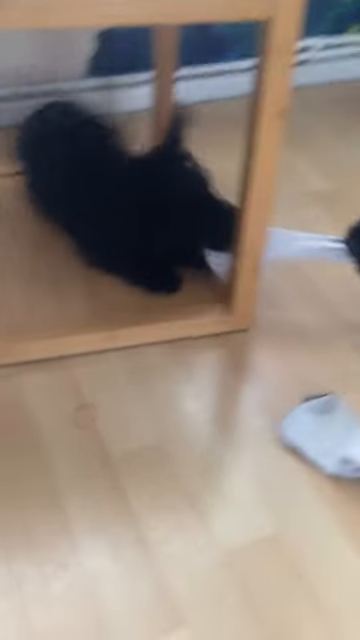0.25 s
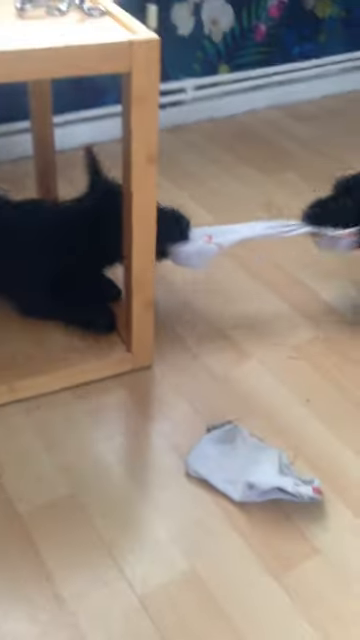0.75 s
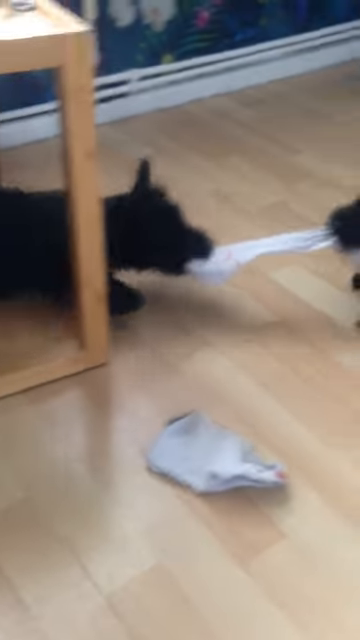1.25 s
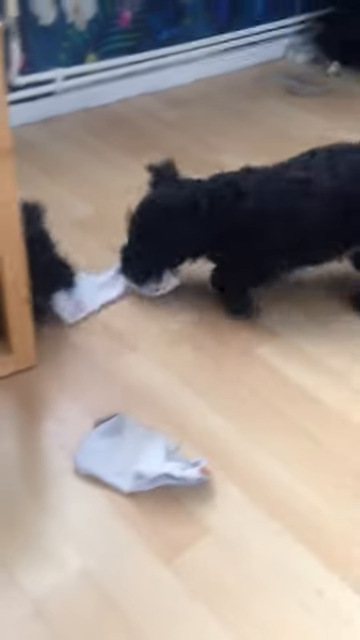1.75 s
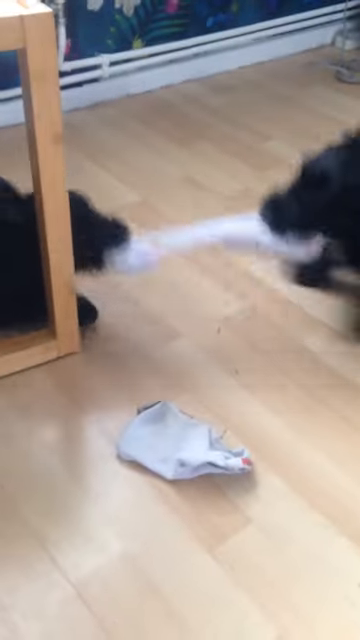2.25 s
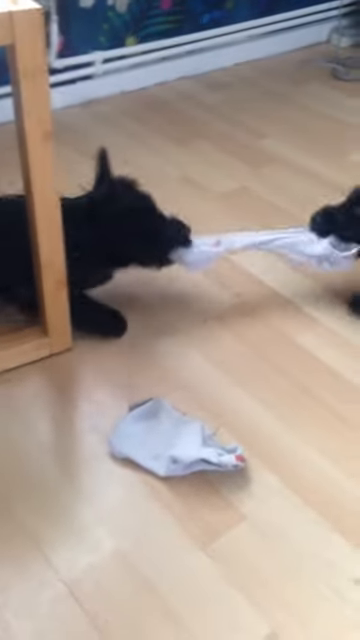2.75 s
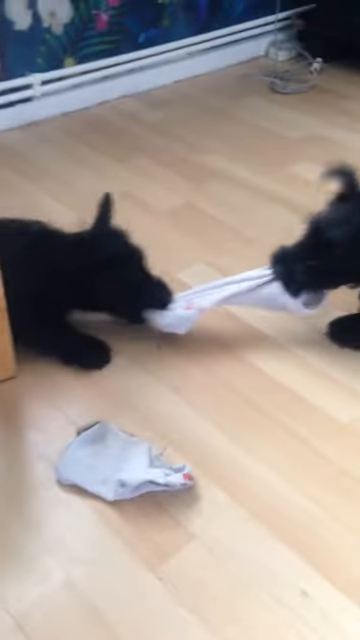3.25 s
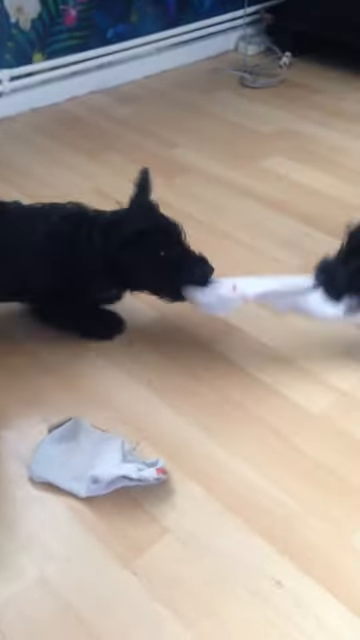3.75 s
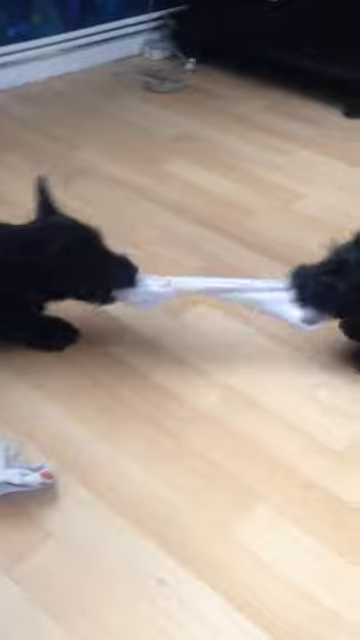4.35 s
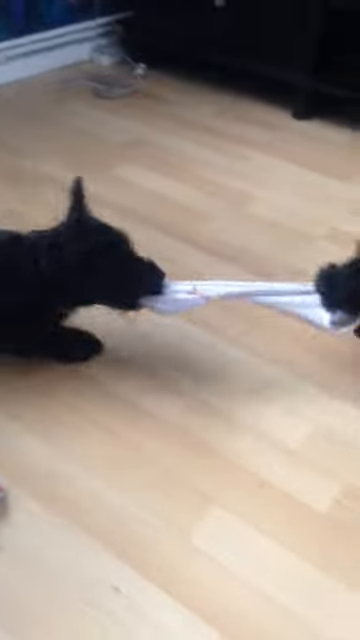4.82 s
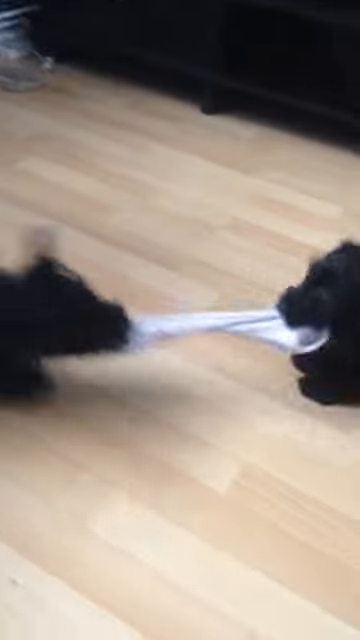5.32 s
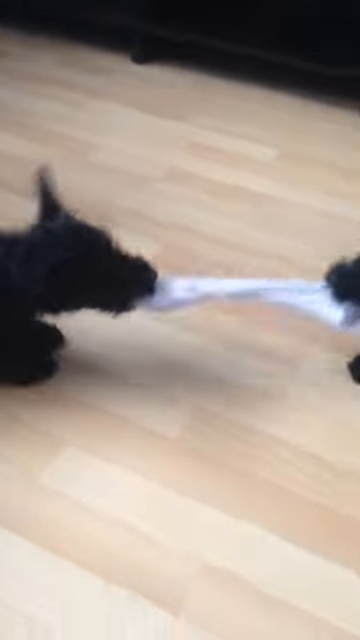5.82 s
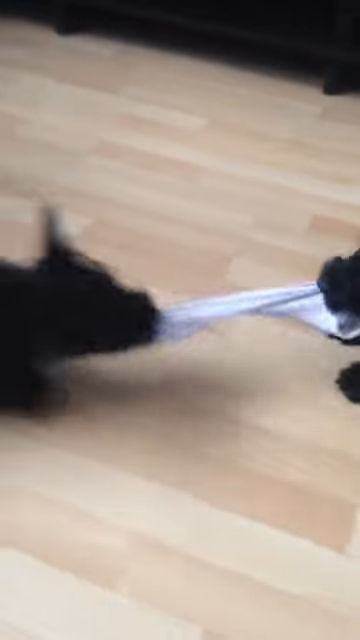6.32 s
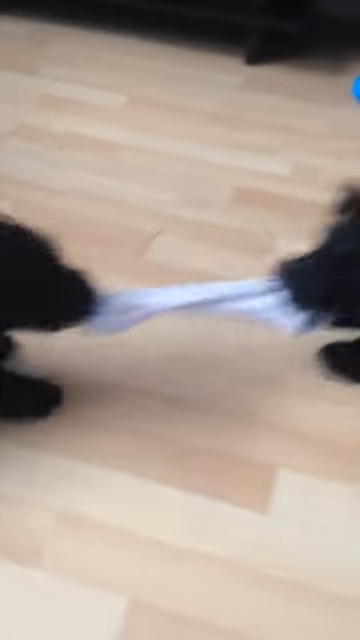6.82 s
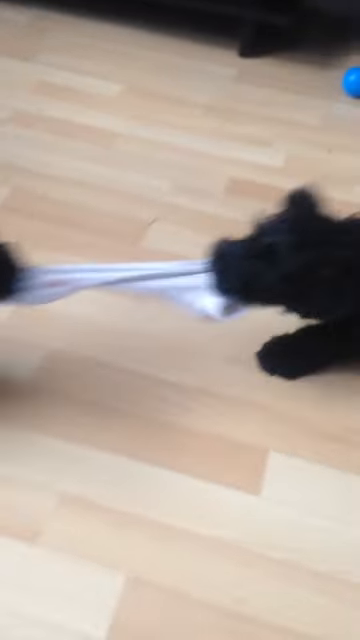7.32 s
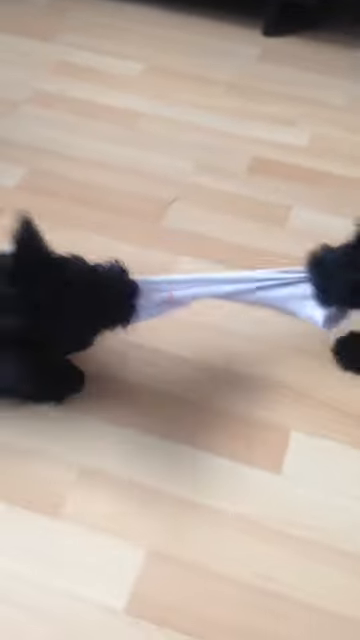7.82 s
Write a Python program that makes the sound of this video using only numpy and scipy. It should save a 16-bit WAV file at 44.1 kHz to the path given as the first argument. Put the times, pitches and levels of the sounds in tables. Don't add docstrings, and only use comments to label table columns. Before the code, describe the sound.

Two small dogs wrestle over a cloth on laminate. First come hollow wooden knocks, floor thumps and one sharp slap amid dry rustling. After three seconds the knocks stop; a strong nasal snort leads to tiny claw ticks, padded footfalls and brief throaty growls, loudest near the middle. Late on, only soft grunts, wheezy breath and a bright hiss remain. Small room, slight reverberation, near phone microphone.

```python
import sys
import numpy as np
from scipy import signal
from scipy.fft import rfft, irfft, next_fast_len
from scipy.io import wavfile
from scipy.ndimage import uniform_filter1d, map_coordinates

SR = 44100
rng = np.random.default_rng(int(sys.argv[2]) if len(sys.argv) > 2 else 0)


def wav_record(signal):
    frames = np.transpose(np.atleast_2d(signal))
    bounded = np.clip(frames, -1, 1)
    quanta = np.round(bounded * 32767).astype(np.int16)
    wavfile.write(sys.argv[1], SR, quanta)


def volts_from_db(level):
    exponent = np.asarray(level, float) / 20
    return 10 ** exponent


N = 355887

# (frequency [Hz], level [dB], t60 [s])
BOARD_MODES = [(98, -15, 0.038), (138, 7.5, 0.04), (200, 4.5, 0.045), (279, -7, 0.1)]


def unit(x):
    return x / np.sqrt(np.mean(x ** 2) + 1e-20)


def along(points, hz):
    f, v = np.transpose(points)
    return np.interp(np.log(hz + 1), np.log(f + 1), v)


def wobble(rate):
    knots = rng.standard_normal(int(N * rate / SR) + 4)
    return map_coordinates(knots, [np.arange(N) * rate / SR])


def filtered(x, response):
    m = next_fast_len(len(x) + SR // 4)
    return irfft(rfft(x, m) * response(np.fft.rfftfreq(m, 1 / SR)), m)[:len(x)]


def low_cut(f, hz, order=4):
    return 1 / (1 + (hz / (f + 1)) ** order)


def high_cut(f, hz):
    return 1 / (1 + (f / hz) ** 4)


def resonances(modes):
    def response(f):
        total = 0
        for k, (centre, width, db) in enumerate(modes):
            total = total + (-1) ** k * volts_from_db(db) * 1j * f * width / (centre * centre - f * f + 1j * f * width)
        return total
    return response


def noise(spectrum):
    return unit(filtered(rng.standard_normal(N), lambda hz: volts_from_db(along(spectrum, hz))))


def ring(modes, t, spread_db):
    x = np.zeros(len(t))
    for hz, db, t60 in modes:
        x += volts_from_db(db + spread_db * rng.normal() - 60 * t / t60) * np.sin(2 * np.pi * hz * t)
    return x / np.abs(x).max()


def add(track, s, x):
    at = round(s * SR)
    part = track[max(at, 0):][:len(x) + min(at, 0)]
    part += x[max(-at, 0):][:len(part)]


def room(x):
    # (frequency [Hz], t60 [s])
    decay = [(100, 0.44), (500, 0.37), (2000, 0.37), (6000, 0.27), (14000, 0.013)]
    hz, t, z = signal.stft(rng.standard_normal(SR // 2), SR, nperseg=256)
    tail = signal.istft(z * volts_from_db(-60 * t / along(decay, hz)[:, None]), SR, nperseg=256)[1]
    late = np.pad(x, (200, 0))
    return signal.fftconvolve(late, tail / np.linalg.norm(tail))[:len(x)]


def table():
    # (time [s], peak [dB], thump [dB], slap [dB], pitch of the struck part [Hz])
    bumps = [(-.03, -17.5, -20, -40, 430), (0.236, -16.5, -11.5, -43, 440), (0.267, -2, -19.5, -16.5, 486),
             (.886, -14, -9.5, -35, 490), (1.157, -51.5, -23, 6, 453), (1.284, -32, -39, -32, 583),
             (1.717, -25, -5, -30, 386), (1.768, -26.5, -28, -32, 1080), (1.905, -33, -36, -10, 1110),
             (2.287, -10.5, -9.5, -39, 716), (2.29, -18.5, -38, -42, 360), (2.81, -32.5, -10, -28, 1100)]
    # (frequency [Hz], level [dB], t60 [s])
    frame_modes = [(372, -2, .2), (415, 1, .22), (470, -3, .2), (515, -3, .18), (550, -5, .12),
                   (620, -4, .14), (655, 0, .14), (716, 0, .22), (765, -2, .14), (1035, -4, .15),
                   (1160, -7, .15), (1470, -9, .16), (1860, -11, .16), (2150, -12, .16)]
    out, t = np.zeros(N), np.arange(SR // 2) / SR
    onset = 1 - np.exp(-(t / .004) ** 2)
    held = .34 + .66 * volts_from_db(-60 * t / .045)
    for s, db, thump_db, slap_db, hz in bumps:
        clack_db = -19 + 0.68 * max(-29.5 - db, 0)
        modes = []
        for f, level, t60 in frame_modes:
            octaves = abs(np.log2(f / hz))
            modes.append((f, level - 5 * octaves, t60 / (1 + 1.2 * octaves)))
        blow = volts_from_db(-60 * t / 0.066) * rng.standard_normal((3, len(t)))
        joints = filtered(blow[2], lambda f: resonances([(hz, 500, -4)])(f) * high_cut(f, 1200))
        frame = filtered(held * ring(modes, t, spread_db=1.5) + joints, lambda f: low_cut(f, 300))
        clack = filtered(blow[0], resonances([(1405, 1400, 7.5), (2050, 980, 9.0), (2570, 510, 2.0),
                                              (4900, 1900, -12)]))
        slap = filtered(blow[1], resonances([(4050, 1000, 0.0088), (9000, 2600, 0.0066)]))
        thump = ring(BOARD_MODES, t, spread_db=1.5)
        mix = frame + volts_from_db(thump_db) * thump + volts_from_db(clack_db) * clack + volts_from_db(slap_db) * onset * slap
        direct = onset * volts_from_db(db + 3.5) * mix
        add(out, s, direct + volts_from_db(-9) * room(direct))
    return out


def patchy(x):
    z = signal.stft(x, nperseg=256)[2]
    field = uniform_filter1d(rng.standard_normal(z.shape), size=5, axis=0)
    field = uniform_filter1d(field, size=10, axis=1)
    patch_db = 2.2
    return signal.istft(z * volts_from_db(patch_db * unit(field)), nperseg=256)[1][:len(x)]


def scuffle():
    # (time of the peak [s], peak [dB], rise [s], fall [s])
    slides = [(0, -63.5, .1, .25), (.259, -53.5, 0.16, 0.44), (.654, -54.5, 0.17, 0.23),
              (0.879, -57, 0.069, 1), (1.252, -57.5, 0.19, 0.38), (1.781, -58, 0.066, 0.22),
              (1.96, -54.5, 0.081, 0.098), (2.14, -58.5, 0.13, 0.94), (2.48, -58, 0.14, 0.2),
              (2.769, -50, 0.13, 0.13), (3.038, -61, 0.75, 0.1), (3.218, -53.5, 0.1, 0.094),
              (3.368, -59, 0.019, 0.036), (3.497, -61, 0.058, 0.42), (3.76, -50.5, 0.078, 0.31),
              (3.88, -58, 0.2, 0.14), (4.076, -64.5, 0.072, 0.17), (4.225, -60, 0.28, 0.56),
              (4.605, -57, 0.29, 0.1), (4.764, -58.5, 0.015, 0.018), (4.929, -56, 0.17, 0.31),
              (5.348, -58, .16, 0.86), (5.682, -57.5, 0.3, 0.2), (6.006, -62.5, 0.29, 0.99),
              (6.276, -59.5, 0.15, 0.24), (6.52, -58.5, 0.22, 0.26), (6.795, -63, 0.2, 0.44),
              (7.119, -60, 0.093, 0.15), (7.47, -58, 0.27, 0.46), (7.927, -61.5, 0.15, 0.84)]
    # (time [s], fizz over rub [dB])
    nap = [(0, -7), (.65, -7.5), (1.2, -5), (1.95, -10), (2.3, -4.5), (2.8, -11), (4.2, -6.5), (4.8, -8.5),
           (5.7, -5), (8.07, -1.5)]
    # (time [s], level [dB])
    haul = [(0, -81), (.32, -67.5), (.9, -73), (1.12, -62.5), (1.3, -60.5), (1.75, -80), (1.89, -64.5),
            (2.2, -70.5), (2.4, -59), (2.54, -66), (3.28, -67), (3.53, -87), (3.66, -70), (4.67, -69.5),
            (5.2, -67.5), (6.61, -70), (8.07, -70)]
    # (frequency [Hz], level [dB per Hz])
    rub_spectrum = [(1060, -6), (1800, -3), (3350, -0.5), (3790, 1), (4560, -1), (5090, 0), (9130, -2.5),
                    (10500, -15), (13600, -89.5), (22000, -120)]
    fizz_spectrum = [(7500, -61), (9000, 9.5), (10000, 14.5), (13000, 13), (15300, 5), (16500, -26)]
    drag_spectrum = [(120, -23), (300, -11), (450, 1.5), (900, -2), (1100, -1), (1700, -5.5), (2200, -7.5),
                     (2800, -15.5), (3500, -49)]
    still_db, point = -72.5, 1.86
    t = np.arange(N) / SR
    power = volts_from_db(2 * still_db) + np.zeros(N)
    for s, db, rise, fall in slides:
        power += volts_from_db(2 * db) * np.interp(t, [s - rise, s, s + fall], [0, 1, 0]) ** (2 * point)
    grain = unit(volts_from_db(1.27 * wobble(35) + 0.83 * wobble(300)))
    rub = np.sqrt(power) * volts_from_db(wobble(34)) * noise(rub_spectrum)
    fizz_db = np.interp(t, *np.transpose(nap)) + wobble(20)
    fizz = np.sqrt(power) * volts_from_db(fizz_db) * noise(fizz_spectrum)
    drag = volts_from_db(np.interp(t, *np.transpose(haul)) + wobble(34)) * noise(drag_spectrum)
    return grain * patchy(rub + fizz + drag)


def hush():
    # (frequency [Hz], level [dB per Hz])
    hush_spectrum = [(24, -36), (40, 7), (103, 7.5), (286, 0), (425, -2.5), (633, -15), (792, 3.5),
                     (897, -53), (1020, -17), (2960, -11), (6730, -10), (12200, -24), (15300, -16)]
    return volts_from_db(-69 + wobble(3.7)) * noise(hush_spectrum)


def snorts():
    # (time [s], peak [dB], rise [s], t60 [s], pitch [Hz])
    jets = [
        (0.052, -49.5, 0.016, 0.24, 5200),
        (3.753, -26.5, 0.022, 0.2, 4570),
        (3.904, -47, 0.006, .08, 4500),
        (4.929, -50, 0.0067, 0.21, 6000),
        (5.621, -52, 0.023, 0.15, 8000),
        (7.934, -34, 0.037, 0.18, 12800),
        (7.94, -42.5, 0.039, 0.24, 3170),
    ]
    out, t = np.zeros(N), np.arange(SR // 4) / SR
    for s, db, rise, t60, hz in jets:
        nose = resonances([(hz, 1.1 * hz, 0), (3800, 1200, -3)])
        jet = filtered(rng.standard_normal(len(t)),
                       lambda f: nose(f) * low_cut(f, 1500, order=2) * high_cut(f, 14000))
        add(out, s, volts_from_db(db - 60 * t / t60) * np.clip(t / rise, 0, 1) ** 2 * unit(jet))
    return out


def paws():
    # (time [s], peak [dB], pitch [Hz])
    landings = [(1.539, -69, 186), (2.118, -50.5, 380), (2.85, -61, 516), (3.801, -43.5, 546),
                (4.098, -39.5, 200), (4.762, -51, 726), (3.474, -54, 430), (4.892, -28.5, 444),
                (5.023, -36, 432), (5.804, -54, 585), (6.279, -48.5, 560), (6.888, -52.5, 810),
                (7.773, -73, 403), (1.882, -48, 600), (7.103, -48, 357), (7.1735, -44, 607),
                (7.483, -50, 482), (7.525, -42, 294), (7.55, -42.5, 543), (7.867, -40.5, 410)]
    lunges = [
        (0.228, -36, 200),
        (2.2833, -29, 280),
    ]
    out, t = np.zeros(N), np.arange(SR // 4) / SR
    for s, db, hz in landings + lunges:
        smack = volts_from_db(-3 - 60 * t / 0.008) * np.sin(2 * np.pi * 2 * hz * t)
        push = np.sin(2 * np.pi * hz * t) * volts_from_db(-60 * t / 0.021) + smack
        push = push * (1 - np.exp(-t / 0.0009))
        push = filtered(push, lambda f: low_cut(f, 120) * high_cut(f, hz * 2.4))
        add(out, s, volts_from_db(db + 3) * (push + volts_from_db(-18) * ring(BOARD_MODES, t, spread_db=3)))
    return out


def hums():
    # (time [s], length [s], swell [s], pitch at the start [Hz], peak [dB])
    tones = [
        (0.329, 0.18, .008, 142, -62),
        (.545, 0.19, 0.13, 133, -62.5),
        (1.414, 0.23, 0.14, 118, -78),
        (6.09, 0.23, 0.051, 103.3, -62.5),
    ]
    sag_hz_per_s, swell_db, fade_db = 61, 5, 3
    out = np.zeros(N)
    for s, length, swell, hz, db in tones:
        t = np.arange(0, length, 1 / SR)
        turn = 2 * np.pi * np.cumsum(hz - sag_hz_per_s * t) / SR
        edges = np.clip(np.minimum(t, length - t) / .012, 0, 1)
        level_db = db + np.interp(t, [0, swell, length], [-swell_db, 0, -fade_db])
        add(out, s, edges * volts_from_db(level_db + 1.0) * (np.sin(turn) + volts_from_db(-17.5) * np.sin(2 * turn)))
    return out * volts_from_db(wobble(37))


def claws():
    # (time [s], peak [dB], pitch [Hz], dull part [dB])
    ticks = [(1.1639, -36, 4340, -32), (1.707, -47, 6960, -14), (1.9089, -54, 3850, 10.5),
             (1.959, -43, 8100, -17), (2.41, -41.5, 7000, -35), (3.445, -48, 2400, -27),
             (3.715, -46, 7560, -23), (4.1693, -28, 7000, -25), (4.752, -51, 3920, -37),
             (4.884, -48, 3210, -22), (4.948, -32.5, 6940, -12), (5.053, -39, 8400, -29),
             (5.142, -47, 6800, -28), (5.247, -46, 7000, -35), (5.279, -47, 6450, -25),
             (5.3315, -43, 6600, -23), (5.5404, -41, 7140, -13), (5.6319, -37.5, 9400, -23),
             (6.116, -42.5, 8050, -20), (6.2687, -46, 12600, -16), (6.444, -43, 7900, -14),
             (6.483, -41.5, 2500, -12), (6.6955, -48.5, 6600, -27), (6.776, -51, 6800, -3.5),
             (6.8909, -40, 5660, -17.5), (7.0881, -40.5, 9100, -15.5), (7.2693, -50.5, 7340, -15),
             (7.4556, -34, 7500, -17.5), (7.862, -49.5, 10600, -13), (7.934, -44, 13000, -28)]
    out, t = np.zeros(N), np.arange(SR // 20) / SR
    dig_in = 1 - np.exp(-t / .0004)
    for s, db, hz, dull_db in ticks:
        burst = volts_from_db(-60 * t / .011) * dig_in * rng.standard_normal((2, len(t)))
        tick = filtered(burst[0], resonances([(hz, 0.82 * hz, 2), (.5 * hz + 3000, 6000, -4)]))
        tap = filtered(burst[1], resonances([(1030, 930, 12.3)]))
        add(out, s, volts_from_db(db + 9.0) * (tick + volts_from_db(dull_db) * tap))
    return out


def voices(calls, roughness, throats, jitter, shimmer_db, sag, fade_db_per_s, chest_db, chest_lingers, open_db):
    # (centre [Hz], width [Hz], level [dB])
    throat_modes = [(310, 70, -3), (435, 65, 5), (550, 120, -4)]
    chest_modes = [(192, 85, 0)]
    mouth_modes = [(730, 130, 7), (1070, 120, 8), (1290, 130, 5)]
    nose_modes = [(1860, 330, -9), (3260, 320, -7.5)]
    release_db = 42
    slacken_s, sink_s, jaws_part_s, chest_joins_s = 0.043, .09, .022, .07
    throat_sinks = 1.12
    out = np.zeros(N)
    for (s, held, catch_hz, held_db, swell_db), rough, size in zip(calls, roughness, throats):
        t = np.arange(0, held + release_db / fade_db_per_s, 1 / SR)
        shape_db = np.where(t < held, swell_db * (t / held - 1), fade_db_per_s * (held - t))
        db = held_db + shape_db
        hz = catch_hz * (1 - sag * (1 - np.exp(-t / slacken_s)))

        chance = (rough + .17) * rng.standard_normal((200, 2))
        turns = np.cumsum(hz) / SR
        count = np.arange(int(turns[-1]) + 1)
        at = np.searchsorted(turns, count + 0.33 + jitter * chance[count, 0]).clip(0, len(t) - 1)
        puffs = np.bincount(at, volts_from_db(shimmer_db * chance[count, 1]), len(t))
        air = uniform_filter1d(puffs, size=130) * rng.standard_normal(SR)[:len(t)]
        source = np.sqrt(1 - rough) * unit(puffs) + np.sqrt(rough) * unit(air)

        def through_throat(k):
            return filtered(source, lambda f: resonances(throat_modes)(f * k) * high_cut(f * k, 800)
                            * low_cut(f, 230))

        sunk = np.clip(t / sink_s, 0, 1) ** 2
        throat = unit((1 - sunk) * through_throat(size) + sunk * through_throat(size * throat_sinks))
        chest = unit(filtered(source, lambda f: resonances(chest_modes)(f) * high_cut(f, 270) * low_cut(f, 125)))
        hiss = (0.75 + unit(uniform_filter1d(puffs, size=220))) * rng.standard_normal(SR)[:len(t)]
        rasp = .6 * source + hiss
        mouth = unit(filtered(rasp, lambda f: resonances(mouth_modes)(f) * low_cut(f, 600) * high_cut(f, 1700)
                              + resonances(nose_modes)(f) ** 2 * volts_from_db(8.5)))

        edges = np.clip(np.minimum(t, t[-1] - t) / 0.0054, 0, 1)
        chest_gain = volts_from_db(chest_db - chest_lingers * (db + 46)) * np.clip(.45 + t / chest_joins_s, 0, 1)
        mouth_gain = volts_from_db(open_db + 14.5 * rough) * np.clip(t / jaws_part_s, 0, 1) ** 2
        add(out, s, -edges * volts_from_db(db - 1.0) * (throat + chest_gain * chest + mouth_gain * mouth))
    return out


def grumbles():
    # (time [s], held [s], pulse rate at the catch [Hz], level at the end of the hold [dB], swell over it [dB])
    calls = [
        (1.87, 0.11, 218, -66.5, -2),
        (3.47, 0.086, 143, -61.5, 1.5),
        (3.682, 0.067, 149.9, -59, 3.5),
        (7.455, 0.079, 74.1, -59, 2),
    ]
    roughness = [.2, .3, .25, .1]
    return voices(calls, roughness, np.ones(len(calls)), jitter=.2, shimmer_db=3, sag=0.0083,
                  fade_db_per_s=400, chest_db=-7.5, chest_lingers=.05, open_db=-7.5)


def grunts():
    # (time [s], held [s], pulse rate at the catch [Hz], level at the end of the hold [dB], swell over it [dB])
    calls = [
        (3.128, 0.0096, 216, -50.5, 31),
        (5.062, 0.04, 98, -55.5, 3),
        (5.094, 0.095, 98, -48.5, 7),
        (6.92, 0.14, 242.7, -70, -3),
        (7.135, 0.033, 282, -64, 4),
        (7.175, 0.072, 269, -62.5, -0.5),
        (7.77, 0.13, 149.2, -70.5, -5.5),
        (7.938, 0.018, 70.7, -50.5, 2),
    ]
    roughness = [.1, .15, .1, .3, .1, .08, .2, .05]
    return voices(calls, roughness, np.ones(len(calls)), jitter=.2, shimmer_db=4, sag=0.0075,
                  fade_db_per_s=798, chest_db=2.5, chest_lingers=0.051, open_db=-15.5)


def wheezes():
    # (time [s], length [s], level [dB], pitch [Hz], width [Hz])
    breaths = [
        (3.483, 0.1, -59, 780, 70),
        (4.22, 0.25, -71.5, 1750, 400),
        (5.827, 0.4, -67, 1670, 400),
        (6.911, 0.11, -64, 1640, 302),
        (7.071, 0.4, -68.5, 1710, 350),
    ]
    out = np.zeros(N)
    for s, length, db, hz, width_hz in breaths:
        air = rng.standard_normal(SR // 2)[:round(length * SR)]
        band = filtered(air, lambda f: resonances([(hz, width_hz, 0)])(f) ** 2)
        add(out, s, volts_from_db(db) * np.sqrt(np.hanning(len(air))) * unit(band))
    return out


def growls():
    # (time [s], held [s], pulse rate at the catch [Hz], level at the end of the hold [dB], swell over it [dB])
    calls = [
        (4.505, 0.071, 115.1, -40.5, 11),
        (4.845, 0.053, 150.9, -31.5, 10.5),
        (4.915, 0.067, 121.9, -49.5, -9),
        (5.409, 0.031, 179, -31.5, 10),
        (5.452, 0.049, 124.9, -43.5, 2),
        (5.948, 0.089, 138, -45, -2.5),
        (6.433, 0.085, 118.1, -48, -0.5),
    ]
    roughness = [.16, .22, .26, .1, .18, .1, .14]
    throats = [.93, .95, 1.0, .98, 1.04, 1.0, .96]
    return voices(calls, roughness, throats, jitter=.38, shimmer_db=4.0, sag=.26,
                  fade_db_per_s=750, chest_db=-3.5, chest_lingers=0.23, open_db=-16.0)


def scene():
    dogs = growls() + grunts() + grumbles() + hums()
    pads, nails = paws(), claws()
    answer = room(volts_from_db(-12) * dogs) + room(volts_from_db(-8) * pads + volts_from_db(-6) * nails)
    return (dogs + table() + pads + nails + snorts() + wheezes() + answer + scuffle() + hush())[None]


def band_limit(x):
    return signal.sosfilt(signal.butter(12, 16460, fs=SR, output="sos"), x)


def record(dry):
    def band(hz):
        return 1 / np.sqrt(1 + (75 / (hz + 1)) ** 6) / np.sqrt(1 + (hz / 15400) ** 200)

    rumble = volts_from_db(-80.0) * noise([(10, -20), (25, 0), (60, -2.5), (90, 10.5), (150, -72)])
    return band_limit((filtered(dry[0], band) + rumble)[None])


dry = scene()
out = record(dry)
wav_record(out)
```